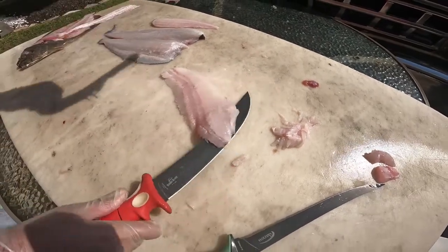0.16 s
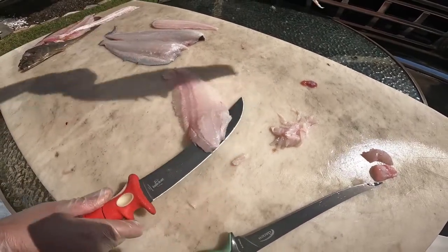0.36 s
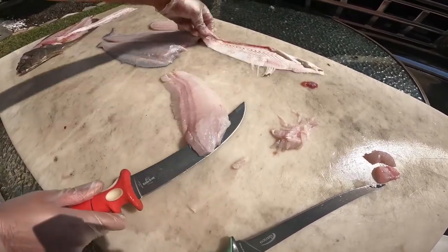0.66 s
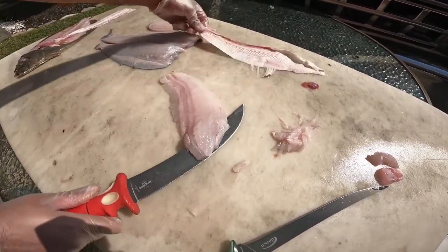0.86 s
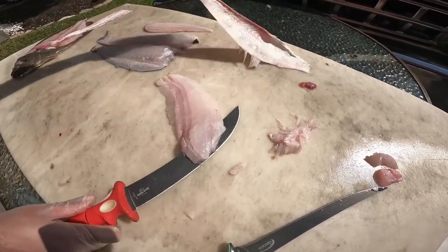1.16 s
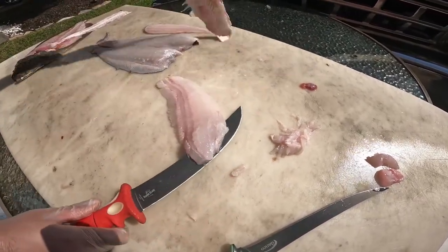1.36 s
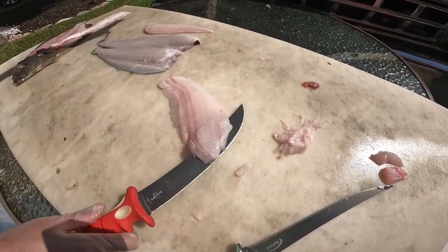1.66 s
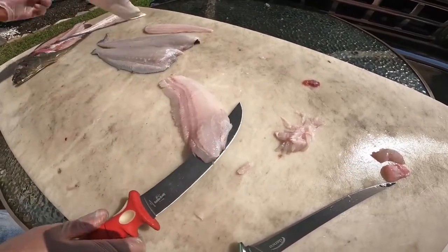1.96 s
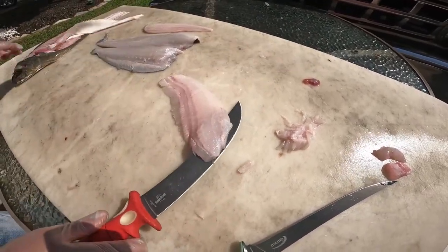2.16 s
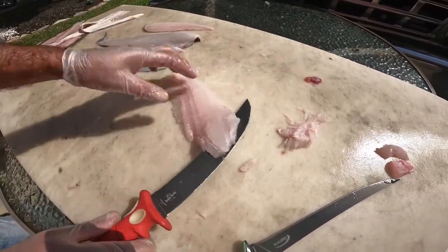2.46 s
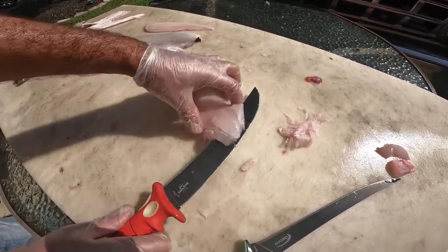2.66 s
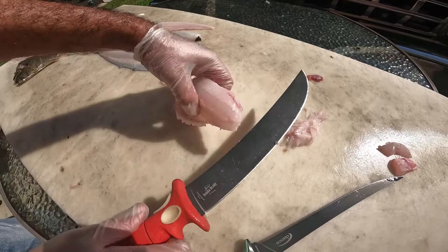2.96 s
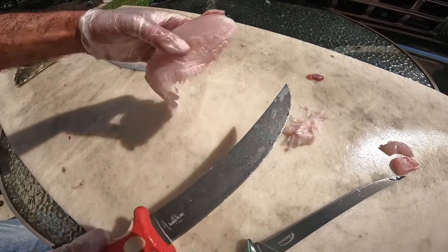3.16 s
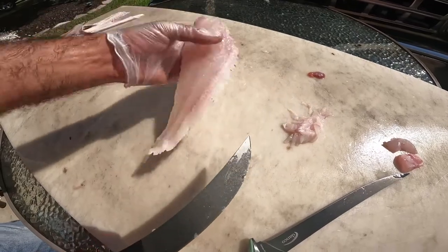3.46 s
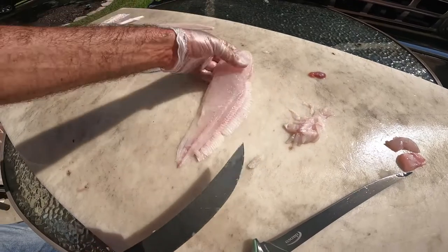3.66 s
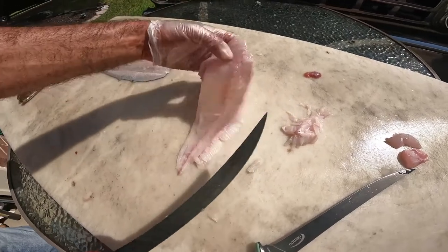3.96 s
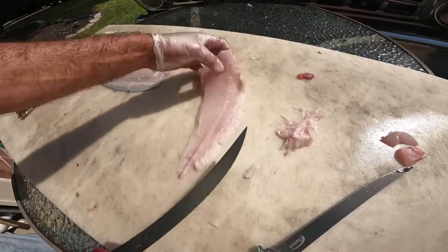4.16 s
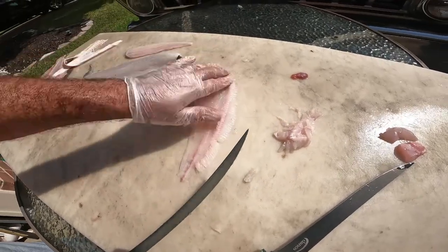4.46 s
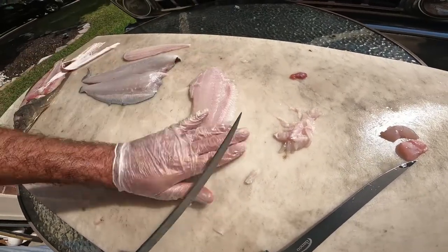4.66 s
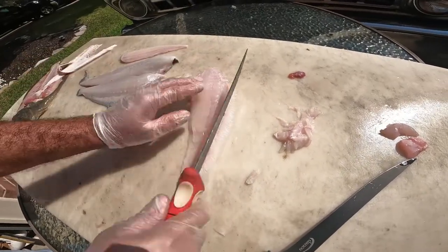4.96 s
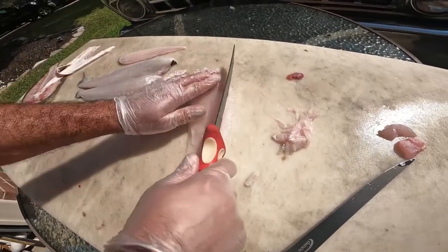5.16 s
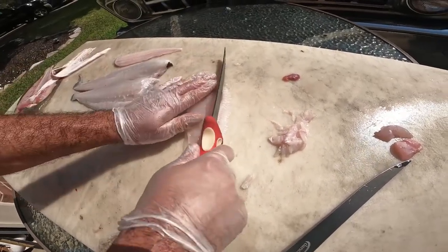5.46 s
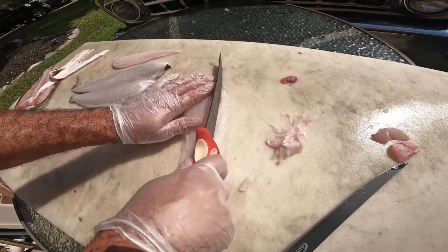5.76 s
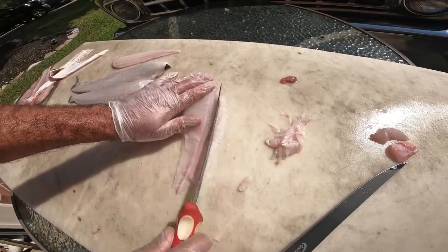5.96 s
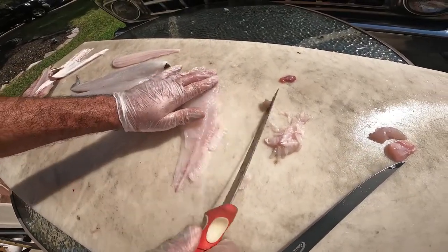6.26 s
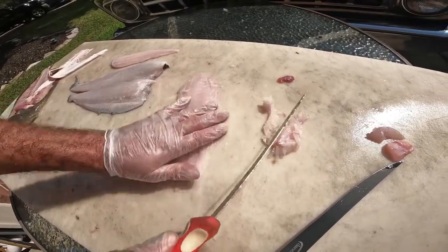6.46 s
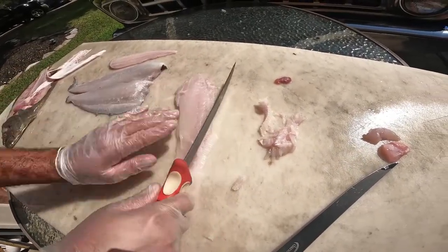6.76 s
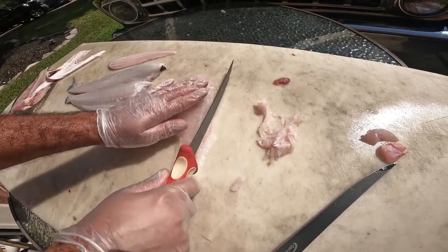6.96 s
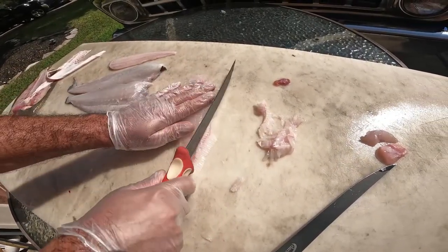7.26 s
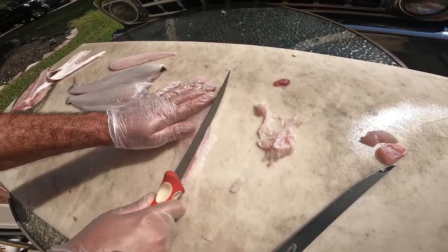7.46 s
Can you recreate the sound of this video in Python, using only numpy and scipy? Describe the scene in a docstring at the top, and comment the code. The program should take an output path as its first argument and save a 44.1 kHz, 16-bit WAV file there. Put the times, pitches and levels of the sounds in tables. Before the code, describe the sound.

Close stereo microphone at an outdoor table. A knife slides briefly through fish skin, then a sharp wet slap lands with a soft thud. Quiet sticky clicks and glove rustle follow, another flop and thud in the middle, a knife knock on the hollow board, a soft slice, a loud ringing scrape, more knocks and a final swelling slice. A faint motor hums far off over low rumble.

```python
"""A steel blade slides, slices, scrapes and knocks as fish fillets are skinned and trimmed outdoors on a
hard board on a hollow table: friction noise drives the strokes, struck modes ring in the knocks.
Wet flesh slaps, thuds and clicks as short decaying pulses; gloves rustle as hiss with resonant crackle.
Far off, a motor hums as harmonics of its shaft speed, over gliding narrow-band hiss and a low
outdoor rumble of coloured noise."""
import sys
import numpy as np
from scipy import signal
from scipy.fft import rfft, irfft, next_fast_len
from scipy.io import wavfile

SR = 44100
rng = np.random.default_rng(int(sys.argv[2]) if len(sys.argv) > 2 else 0)


def to_wav(s):
    """Save 16-bit WAV."""
    ch = np.atleast_2d(s).T  # columns
    pcm = np.round(np.clip(ch, -1, 1) * 32767)  # PCM
    wavfile.write(sys.argv[1], SR, pcm.astype(np.int16))


N = 336042
TIME = np.arange(N) / SR

# Modes of the steel blade, the lower ones damped by contact: f/Hz, relative level/dB, t60/s
BLADE_MODES = [(581, -6, .05), (964, -8, .06), (1222, -5, .06), (1820, -9, .04), (2300, -6, .02),
               (2758, -7, .04), (2841, -3, .045), (3500, -5, .015), (4770, -8, .025), (6308, -10, .17),
               (6777, -11, .06), (7455, -11, .07), (8250, -9, .03), (9910, -8, .025), (10970, -10, .08),
               (11150, -4, .03), (12800, -9, .03)]
# Modes of the board on its hollow table: f/Hz, relative level/dB, t60/s
BOARD_MODES = [(96, -8.5, 0.051), (150.44, -5, 0.18), (223.7, -10.5, 0.29), (287, -5, 0.11),
                (381.4, -3.5, 0.19), (491, -9, 0.12), (539, -1.5, 0.087), (543, 9, 0.024), (701, -3, 0.071),
               (740, -11, 0.026), (900, -20, 0.081), (943, -14.5, .06), (1112, -4, 0.04),
               (1220, -11, 0.044), (1500, -16.5, 0.057), (1640, -5.5, 0.043), (1950, -17, 0.022)]


def from_db(db):
    """Amplitude ratio of a level in dB."""
    return 10 ** (np.asarray(db) / 20)


def rms_one(x):
    """Normalisation to unit root mean square."""
    return x / np.sqrt(np.mean(x ** 2) + 1e-20)


def at_hz(points, hz):
    """Interpolation of a spectrum along a logarithmic frequency axis."""
    points = np.array(points)
    return np.interp(np.log(hz), np.log(points[:, 0]), points[:, 1])


def bin_hz(size):
    """Frequencies of the Fourier bins, held at 1 Hz or more so that their logarithm exists."""
    return np.maximum(np.arange(size // 2 + 1) * SR / size, 1)


def filtered(x, order, hz, kind="low"):
    """Causal Butterworth filtering: a passband free of ripple."""
    return signal.sosfilt(signal.butter(order, hz, kind, fs=SR, output="sos"), x)


def drift(rate_hz, size=N):
    """Slow random modulation of unit spread: noise through two equal one-pole low-passes."""
    step = 40  # samples between the coarse points
    pole = np.exp(-2 * np.pi * rate_hz * step / SR)
    settling = 2000  # coarse points dropped while the filter settles
    noise = rng.standard_normal(size // step + settling + 2)
    slow = rms_one(signal.lfilter([1], [1, -2 * pole, pole * pole], noise))[settling:]
    return np.interp(np.arange(size) / step, np.arange(len(slow)), slow)


def coloured(x, spectrum):
    """Spectral shaping by multiplication in the frequency domain, at unit rms."""
    size = next_fast_len(x.shape[-1])
    shaped = irfft(rfft(x, size) * from_db(at_hz(spectrum, bin_hz(size))), size)
    return rms_one(shaped[..., :x.shape[-1]])


def ring(x, hz, t60):
    """Damped resonance: a unit click excites a decaying sine of initial height near 1."""
    radius = from_db(-60 / (t60 * SR))
    angle = 2 * np.pi * min(hz, 16000) / SR
    feedback = [1, -2 * radius * np.cos(angle), radius * radius]
    return signal.lfilter([0, np.sin(angle)], feedback, x + 1e-18)


def modes(x, table):
    """Modal superposition: the resonances of a body add, neighbours in opposite phase."""
    return sum((-1) ** k * from_db(db) * ring(x, hz, t60) for k, (hz, db, t60) in enumerate(table))


def burst(t, rise_s, fall_s):
    """Exponential attack and decay of an envelope."""
    return (1 - np.exp(-t / rise_s)) * np.exp(-t / fall_s)


def grains(per_s, spread_db, size):
    """Random micro-contacts: sparse impulses of very uneven strength and random sign, at unit rms."""
    strength = from_db(spread_db * np.minimum(rng.exponential(1, size), 4))
    strength = strength * rng.choice([-1, 1], size)
    return rms_one(strength * (rng.random(size) < per_s / SR))


def patchy(x, patch_db):
    """Independent band modulation: each third-octave band swells and sinks by itself."""
    wander_hz = 23
    size = next_fast_len(len(x))
    # position in third octaves above 500 Hz; everything lower belongs to the first band
    place = 3 * np.log2(np.maximum(bin_hz(size), 500) / 500)
    whole = rfft(x, size)
    total = np.zeros(len(x))
    for k in range(16):
        band = irfft(whole * np.clip(1 - abs(place - k), 0, 1), size)[:len(x)]
        total += from_db(patch_db * drift(wander_hz, size=len(x))) * band
    return total


def panned(x, pan_db):
    """Stereo placement by level difference: left louder by pan_db."""
    return np.array([x * from_db(pan_db / 2), x * from_db(-pan_db / 2)])


def add(out, s, piece):
    """Superposition of a stereo piece at time s."""
    i = round(s * SR)
    out[:, i:i + piece.shape[1]] += piece[:, :N - i]


def stroke(rows, colour, grit, judder_db, ring_db, pan_db, patch_db, echo_ms):
    """Friction excitation: noise and grit under varying pressure drive the blade, which rings on a little."""
    s, level_db = np.transpose(rows)
    tail = 9000  # samples for the blade to ring out
    t = s[0] + np.arange(round((s[-1] - s[0]) * SR) + tail) / SR
    contact = rng.standard_normal(len(t)) + grit * grains(2100, 2.6, len(t))
    contact = patchy(contact, patch_db)
    pressure = from_db(np.interp(t, s, level_db, right=-120) + judder_db * drift(60, size=len(t)))
    ringing = modes(contact * pressure, BLADE_MODES) / np.std(modes(contact, BLADE_MODES))
    # the path along blade and board changes as the contact travels, so the comb stripes glide
    lag_s = np.interp(t, [s[0], s[-1]], echo_ms) / 1000
    rub = coloured(contact, colour)
    first_echo = 0.091 * np.interp(t - lag_s, t, rub)
    second_echo = -0.14 * np.interp(t - 2.7 * lag_s, t, rub)
    rub = rms_one(rub + first_echo + second_echo)
    out = np.zeros((2, N))
    add(out, s[0], panned(pressure * rub + from_db(ring_db) * ringing, pan_db))
    return out


def skinning():
    """Sliding friction of the blade between skin and flesh."""
    # Stroke pressure: t/s, level/dB
    pressure_rows = [(0.0, -49.5), (0.096, -41), (0.13, -46.5), (0.172, -45.5), (0.19, -54.5),
                     (0.238, -57.5), (0.25, -60.5), (0.32, -73)]
    # Friction spectrum: f/Hz, relative density/dB
    colour = [(260, -44), (450, -30), (595, 5.5), (679, -38), (897, -11), (965, -22), (1900, -6.5),
              (3460, -13.5), (3900, -7.5), (4500, -9), (5220, -24), (9520, -18.5), (13000, -29.5),
              (15000, -46)]
    return stroke(pressure_rows, colour, grit=1.0, judder_db=1.0, ring_db=-23, pan_db=-2.5,
                  patch_db=2.0, echo_ms=(.5, .55))


def skin_drag():
    """Sliding friction of the skin drawn along the board, with little grit."""
    # Stroke pressure: t/s, level/dB
    pressure_rows = [(0.645, -41.5), (0.655, -50), (0.679, -48), (0.765, -57), (0.85, -74.5)]
    # Friction spectrum: f/Hz, relative density/dB
    colour = [(590, -42.5), (1000, -8.5), (1820, -8.5), (2160, 0.5), (3520, -7), (4890, -8), (6710, -17),
              (12100, -20.5), (13500, -25), (15000, -58)]
    return stroke(pressure_rows, colour, grit=0.22, judder_db=1.1, ring_db=-60, pan_db=-1.0,
                  patch_db=1.2, echo_ms=(.42, .4))


def slicing():
    """Cutting friction that swells and dies, the blade hardly ringing."""
    # Stroke pressure: t/s, level/dB
    pressure_rows = [(5.76, -72), (5.842, -52), (5.926, -42.5), (6.002, -47), (6.06, -67)]
    # Friction spectrum: f/Hz, relative density/dB
    colour = [(410, -17), (700, -15), (859, -24.5), (965, -0.5), (1150, -2.5), (1720, -9), (2490, -11.5),
              (4160, -15.5), (5310, -26.5), (7510, -19), (11300, -25), (13500, -29), (15000, -62)]
    return stroke(pressure_rows, colour, grit=0.62, judder_db=-1.0, ring_db=-50.0, pan_db=-1.5,
                  patch_db=1.0, echo_ms=(.75, .85))


def scraping():
    """Hard friction along the board, strongly coupled to the modes of the blade."""
    # Stroke pressure: t/s, level/dB
    pressure_rows = [(6.13, -64), (6.142, -37.5), (6.225, -25), (6.245, -31.5), (6.266, -27.5), (6.29, -48),
                     (6.303, -46), (6.34, -67)]
    # Friction spectrum: f/Hz, relative density/dB
    colour = [(210, -45), (350, -16), (385, -29), (597, -2), (733, -8.5), (1190, -4.5), (2130, -12),
              (2830, -3), (4070, -15), (8790, -13), (11300, -7.5), (13200, -16.5), (15000, -45)]
    return stroke(pressure_rows, colour, grit=0.3, judder_db=1.6, ring_db=-5.5, pan_db=-2.6,
                  patch_db=2.5, echo_ms=(.7, .75))


def last_slice():
    """Cutting friction that grows toward the end, uneven from band to band."""
    # Stroke pressure: t/s, level/dB
    pressure_rows = [(7.3, -69.5), (7.442, -55), (7.562, -40), (7.62, -44)]
    # Friction spectrum: f/Hz, relative density/dB
    colour = [(290, -6.5), (500, -1.5), (788, -14.5), (1140, 3.5), (1350, -7), (1500, -1.5), (2880, -11.5),
              (4230, -5.5), (5380, -22), (6670, -9.5), (8610, -13.5), (9650, -9.5), (15000, -24)]
    return stroke(pressure_rows, colour, grit=0.71, judder_db=0.5, ring_db=-31, pan_db=-1.7,
                  patch_db=3.0, echo_ms=(.8, .7))


def grip():
    """Low, juddering friction as fingers grip the fillet and rock the board."""
    # Grip pressure: t/s, level/dB
    pressure_rows = [(2.56, -62), (2.626, -48.5), (2.652, -67), (2.68, -65), (2.7, -59), (2.75, -37),
                     (2.76, -42), (2.82, -59)]
    # Friction spectrum: f/Hz, relative density/dB
    colour = [(59, -28), (100, -17), (179, 8), (259, -8.5), (463, -5), (877, -31.5), (2210, -26),
              (2410, -26.5), (3500, -41), (4550, -77), (7700, -120)]
    return stroke(pressure_rows, colour, grit=1.15, judder_db=5.0, ring_db=-60, pan_db=-3.0,
                  patch_db=0.5, echo_ms=(1.2, 1.3))


def knocks():
    """Impact excitation: a blunt push rings board and table; the edge ticks and rings the upper blade modes."""
    # Edge landing on the board: t/s, relative body level/dB, edge tick level/dB, blade ring level/dB,
    # rattle level/dB, contact time constant/ms
    landings = [(5.433, -9.5, -40, -83, -24, 0.053), (6.941, -12.5, -42, -53.5, -43, 0.32),
                (7.05, -7.5, -36.5, -73.5, -26, 0.2), (7.189, -53, -58, -60.5, -70, 0.22)]
    out, t = np.zeros((2, N)), np.arange(16000) / SR
    upper = [mode for mode in BLADE_MODES if mode[0] > 5000]
    for s, body_db, tick_db, ring_db, rattle_db, contact_ms in landings:
        push = t * np.exp(-1000 * t / contact_ms)
        body = modes(push / push.sum(), BOARD_MODES)
        tick_envelope = burst(t, 0.00088, 0.0025) + 0.059 * burst(t, 0.0017, .012)
        tick = rng.standard_normal(len(t)) * tick_envelope
        blade = modes(1. * (t == 0), upper)
        rattle = rms_one(filtered(rng.standard_normal(len(t)), 2, [600, 1500], "band"))
        rattle = rattle * (burst(t, 0.00038, 0.0033) + 0.08 * burst(t, 0.0013, 0.041))
        hit = from_db(body_db - 12.5) * body + from_db(tick_db) * tick
        hit = hit + from_db(ring_db) * blade + from_db(rattle_db) * rattle
        add(out, s, panned(hit, -2.6))
    return out


def slaps():
    """Cavity collapse: trapped air snaps, the wet film sprays a short tail, the weight rings the board."""
    # Wet slaps: t/s, snap level/dB, snap f/Hz, spray level relative to snap/dB, left over right/dB,
    # board level/dB
    impacts = [(0.23, -35, 1050, -12, 1, -63), (.614, -42.5, 2500, -5, -7, -67),
               (0.6238, -30.5, 2390, -8.5, -5, -57), (0.6318, -25.5, 1500, 15.5, -2, -54),
               (.6326, -10, 2500, -14, -3, -46), (.6360, -2.5, 2550, -19, -4, -46),
               (2.037, -43, 1500, -17, 4, -74), (2.0894, -28, 1560, 1, 0, -47),
               (2.096, -33.5, 2300, -1, -6, -46.5), (2.389, -49, 1290, 1, -2, -69),
               (2.476, -36, 1700, 1.5, -3, -56), (2.732, -40, 1197, -14, -2, -55),
               (2.739, -43, 2400, -27, -2, -67), (2.748, -46, 2400, -14, -2, -52),
               (3.532, -30.5, 3760, -1, 1, -49), (3.540, -25.5, 3860, 5.5, -3.5, -37),
               (3.5431, -15, 2160, -3, -1, -49), (3.554, -27, 1990, -7, -3, -45),
               (4.1472, -32.5, 1630, -6, -2, -43), (4.195, -44, 2400, 0, -6, -48),
               (4.199, -34, 2370, -10, -4, -46.5), (4.205, -33.5, 2770, -11, -4, -56),
               (4.211, -40, 2800, -5, 0, -68), (5.424, -54, 900, -10, -4, -50)]
    out, t = np.zeros((2, N)), np.arange(8000) / SR
    click = 1. * (t == 0)
    push = t * np.exp(-t / 0.000074)
    board = modes(push / push.sum(), BOARD_MODES)
    for s, snap_db, pitch_hz, tail_db, pan_db, weight_db in impacts:
        snap = ring(click, pitch_hz, 9 / pitch_hz)
        snap = snap - .5 * ring(click, 1.75 * pitch_hz, .002) + .5 * ring(click, 3.2 * pitch_hz, .001)
        band_hz = [.6 * pitch_hz, min(3.5 * pitch_hz, 15000)]
        spray = filtered(rng.standard_normal(len(t)), 2, band_hz, "band") * burst(t, .0007, .004)
        slap = from_db(snap_db) * (snap + from_db(tail_db) * spray)
        add(out, s, panned(slap + from_db(weight_db) * board, pan_db))
    return out


def thuds():
    """Soft impact: flesh or hands push slowly, and the table answers with a few damped cycles."""
    # Soft landings: t/s, level/dB, f/Hz
    landings = [(0.633, -24.5, 145), (2.593, -30, 163.6), (2.621, -30, 167), (2.734, -30.5, 161.6),
                (2.99, -31.5, 197.4), (3.541, -24, 145.3), (3.559, -25.5, 142.7), (4.195, -44, 163)]
    out, t = np.zeros((2, N)), np.arange(8000) / SR
    for s, level_db, pitch_hz in landings:
        swing = burst(t, .002, 0.018) * np.sin(2 * np.pi * pitch_hz * t)
        add(out, s, panned(from_db(level_db) * swing, -1.5))
    return out


def clicks():
    """Bubble resonance: parting wet film pops at its own pitch, on a faint broadband puff."""
    # Parting of the film: t/s, relative level/dB, f/Hz, left over right/dB
    pops = [(0.0757, -29, 4120, 2), (0.1604, -44, 4300, 4), (0.303, -46, 10000, 0), (0.339, -50, 9500, 0),
            (0.531, -50, 9000, 0), (0.5434, -43.5, 9000, -2), (0.591, -47, 2780, 0), (1.1492, -41, 3140, 7),
            (1.678, -57.5, 10190, -2.5), (1.787, -46.5, 3804, -4), (1.994, -47.5, 7160, -1),
            (2.0367, -53, 6760, -5), (2.0903, -12, 7140, 3.5), (2.0956, -22, 7840, 2),
            (2.2397, -38, 6850, -1), (2.5905, -53, 3730, -5), (2.7668, -45, 2590, -1.0),
            (2.786, -52, 2550, 2), (2.8095, -48, 4550, -0.5), (2.859, -32, 7600, -2),
            (2.9153, -42, 7350, -10), (2.936, -35, 11130, 0.5), (2.9572, -41, 6930, 5),
            (2.9774, -40, 9150, 0.5), (3.024, -40.5, 7150, 2), (3.102, -39, 4600, -4),
            (3.51, -41, 4240, -5), (3.527, -30, 5100, 15), (3.568, -33, 4250, 5), (3.596, -42, 4240, 11),
            (3.792, -41.5, 7240, 3.5), (4.147, -33, 10500, 3), (4.2997, -37.5, 3400, 1.5),
            (4.4575, -42.5, 10900, 1.5), (4.595, -44, 7300, -1), (4.621, -41.5, 4200, -1.0),
            (5.4061, -46, 3180, 1), (5.657, -48.5, 10920, 1.0), (6.0705, -36, 10000, -4),
            (6.3414, -51, 8500, 3), (6.354, -45, 11500, 7), (6.5052, -37.5, 6960, 0.5),
            (7.2826, -40, 9800, 4)]
    out, t = np.zeros((2, N)), np.arange(1000) / SR
    for s, level_db, pitch_hz, pan_db in pops:
        # differencing tilts the noise toward the treble
        puff = np.diff(rng.standard_normal(len(t) + 1)) * burst(t, .0008, 0.0022)
        impulse = rng.standard_normal(len(t)) * burst(t, 0.00071, 0.0005)
        pop = ring(impulse, pitch_hz, 9.0 / pitch_hz)
        click = pop / np.abs(pop).max() + 0.25 * puff
        add(out, s, panned(from_db(level_db - 5.5) * click, pan_db))
    return out


def rubbing():
    """Power addition of overlapping rubs, giving the strength of a lower and an upper band."""
    # Rubs of gloves and flesh: full strength from t/s, lower-band level/dB, upper over lower/dB,
    # rise per 20 dB/s, hold/s, fall per 20 dB/s
    rubs = [(0.31, -69.5, -8, .05, 0.017, 0.068), (0.466, -72.5, -9, .08, .01, 0.044),
            (0.616, -62, -10, .05, .02, .05), (1.05, -72, 6, 0.19, 0.28, .6),
            (1.789, -67.5, -4, 0.028, 0.011, 0.073), (1.928, -72.5, -4, 0.054, 0.024, 0.032),
            (2.05, -70, 4, .07, 0.066, .03), (2.084, -58.5, 3, .02, .01, 0.088),
            (2.39, -66, -10, 0.16, .02, 0.16), (2.475, -53, -2, 0.0095, 0.0082, 0.023),
            (2.601, -62, -7, 0.04, 0.021, .12), (2.704, -66, 2.5, 0.035, .03, 0.022),
            (2.785, -65, 2, 0.026, 0.11, 0.19), (3.086, -69.5, 1.5, 0.22, .01, 0.079),
            (3.187, -74.5, -4, .08, 0.13, .06), (3.552, -53, -4.5, .05, 0.018, 0.11),
            (3.657, -76, 0.5, .05, 0.086, 0.45), (3.792, -67.5, 3, 0.034, .03, 0.16),
            (4.148, -59.5, -2, 0.015, 0.0079, 0.068), (4.193, -58, -9, .005, .017, 0.095),
            (4.298, -68, -10, .03, 0.0075, .05), (4.55, -70.5, -1.5, 0.52, .04, 0.12),
            (4.63, -61, 4, 0.026, 0.016, 0.071), (4.68, -72.5, 5.5, .05, 0.022, 0.34),
            (4.735, -69.5, 8.5, .03, 0.0097, 0.022), (5.439, -78, -6, .04, 0.0088, .07),
            (5.75, -71.5, -3.5, .25, .05, .1), (6.08, -76.5, 2.5, 0.045, .05, .05),
            (6.343, -71, -10, .04, 0.027, 0.17), (6.489, -74, 9.5, 0.3, 0.029, 0.086),
            (6.666, -72, 0, 0.023, 0.0093, 0.037), (7.05, -76, 0, .02, 0.011, .1),
            (7.185, -81, 7.5, .015, 0.028, 0.19)]
    power = np.zeros((2, N))
    for s, level_db, bright_db, rise_s, hold_s, fall_s in rubs:
        before = (s - TIME) / max(rise_s, .002)
        after = (TIME - s - hold_s) / max(fall_s, .002)
        away = np.clip(np.maximum(before, after), 0, 4)
        band_db = level_db + np.array([[0], [bright_db]])
        power += from_db(2 * band_db) * from_db(-40 * away)  # squared amplitudes
    return np.sqrt(power)


def handling():
    """Rustle of thin plastic and wet flesh: friction hiss plus clumped crackle from resonant creases."""
    # Rustle spectrum: f/Hz, relative density/dB
    rustle_colour = [(530, -41.5), (900, -11), (1600, -2), (1850, -17), (2600, -7.5), (4050, -7.5),
                     (5480, -19.5), (6250, -16.5), (7770, -17), (12900, -21), (16000, -38)]
    crackle_share = 0.37
    pops = grains(900, 4.0, N) * from_db(4.0 * drift(25))
    # each pop falls to one of ten creases, which rings a few cycles at its own pitch
    crease = rng.integers(0, 10, N)
    pitches = np.geomspace(1800, 12500, 10)
    crackle = sum(ring(pops * (crease == k), hz, 7.2 / hz) * np.sqrt(hz) for k, hz in enumerate(pitches))
    mix = (1 - crackle_share) * rng.standard_normal(N) + crackle_share * rms_one(crackle)
    rub = coloured(patchy(mix, patch_db=3.0), rustle_colour)
    # zero-phase split, so that the remainder is the upper band
    low = signal.sosfiltfilt(signal.butter(3, 5500, fs=SR, output="sos"), rub)
    lower, upper = rubbing()
    return lower * rms_one(low) + upper * rms_one(rub - low)


def spread(near, wet_db):
    """Early scattering off table and body, partly decorrelated between the sides; the bass passes unscattered."""
    length = 1300  # samples, over which the echoes fade by 40 dB
    fade = from_db(-np.linspace(0, 40, length))
    shared, own = rng.standard_normal((2, length)) * fade / np.linalg.norm(fade)
    echoes = filtered(shared + 1.5 * own * [[1], [-1]], 2, 900, "high")
    return near + from_db(wet_db) * signal.fftconvolve(near, echoes, axes=1)[:, :N]


def motor():
    """Harmonic series of the shaft speed, each order wavering in level and phase on its way through the air."""
    # Orders of the shaft: multiple of the shaft speed, level/dB rms
    orders = [(1, -60.5), (2, -58), (3, -60.5), (4, -53), (6, -69), (8, -68)]
    turns_per_s, wander = 48.2, 0.012  # mean shaft speed, relative spread of its drift
    turns = np.cumsum(turns_per_s * (1 + wander * drift(.5))) / SR
    hum = np.zeros(N)
    for multiple, level_db in orders:
        height = np.sqrt(2) * from_db(level_db + 2.7 * drift(4.0))
        hum += height * np.sin(2 * np.pi * multiple * turns + 0.71 * drift(1.9))
    return hum


def far_hiss():
    """Quadrature modulation: slow noise on a gliding carrier gives the narrow far hiss of tyres or air."""
    # Course of the hiss: t/s, level/dB, centre f/Hz
    course = [(0.0, -73, 1580), (0.2, -56.5, 1540), (0.551, -67, 1480), (0.801, -76, 1420),
              (1.17, -64, 1372), (1.6, -81, 1330), (2.0, -64.5, 1520), (2.6, -73.5, 1480),
              (2.93, -61, 1560), (3.221, -61, 1470), (3.65, -82, 1560), (4.2, -64, 1380), (4.75, -79, 1350),
              (4.95, -66, 1400), (5.4, -72.5, 1260), (5.949, -64.5, 1290), (6.4, -78, 1290),
              (7.09, -72, 1500), (7.34, -62.5, 1308), (7.62, -59, 1290)]
    s, level_db, centre_hz = np.transpose(course)
    phase = 2 * np.pi * np.cumsum(np.interp(TIME, s, centre_hz)) / SR
    slow = filtered(rng.standard_normal((2, 2, N)), 2, 170)
    mid, side = slow[0] * np.cos(phase) + slow[1] * np.sin(phase)
    return from_db(np.interp(TIME, s, level_db)) * rms_one(mid + 0.75 * side * [[1], [-1]])


def outdoors():
    """Partial coherence: rumble of far traffic and air whose two sides part toward the treble."""
    # Rumble spectrum: f/Hz, relative density/dB
    rumble_colour = [(15, -31.5), (25, -1), (63, 3.5), (134, -6.5), (195, -0.5), (249, -11.5), (373, -12.5),
                     (439, -15.5), (818, -30.5), (1370, -26.5), (1890, -33), (5280, -55), (6920, -49.5),
                     (10700, -50.5), (16000, -73)]
    # Course of the rumble: t/s, level/dB
    course = [(0.0, -46), (1.4, -48), (2.46, -45), (2.74, -42.5), (2.95, -47), (3.3, -48), (3.61, -40),
              (3.8, -51.5), (4.05, -45), (5.22, -49), (6.2, -44), (6.45, -50), (7.34, -48.5), (7.62, -49.5)]
    # Likeness of left and right: f/Hz, correlation (0 to 1)
    likeness = [(60, 1), (180, 0.92), (550, 0.69), (1650, 0.59), (4970, 0.54), (15000, 0.42)]
    white = rng.standard_normal((2, N))
    alike = np.clip(at_hz(likeness, bin_hz(N)), 0, .999)
    mid, side = irfft(rfft(white) * np.sqrt([1 + alike, 1 - alike]), N)
    bed = coloured(mid + side * [[1], [-1]], rumble_colour)
    swell_db = 1.2 * drift(5)
    return from_db(np.interp(TIME, *np.transpose(course)) + swell_db) * bed


def scene():
    """Superposition of scattered near work on the board and the far background."""
    near = skinning() + skin_drag() + slicing() + scraping() + last_slice() + grip()
    near += knocks() + slaps() + thuds() + clicks() + panned(handling(), -0.89)
    right_lean_db = 0.76
    far = panned(1, -right_lean_db)[:, None] * (motor() + far_hiss() + outdoors())
    return spread(near, wet_db=-13) + far


def record(dry):
    """Linear filtering by the microphone housing: a lower-treble notch and a dull top, then a steep cut."""
    # Microphone in its housing: f/Hz, left level/dB, right level/dB
    response = np.array([(20, -11.5, -5), (40, -1, 0), (4570, -1.5, -1.5), (5600, -3.5, -4.5),
                         (6367, 0.5, -1), (9100, -1.5, -2.5), (12930, 0, -5), (14200, -12.5, -10.5),
                         (16000, -21, -19)])
    cutoff_hz = 16527
    size = next_fast_len(N)
    gain = from_db([at_hz(response[:, [0, side]], bin_hz(size)) for side in (1, 2)])
    heard = irfft(rfft(dry, size) * gain, size)[:, :N]
    return signal.sosfilt(signal.cheby2(12, 70, cutoff_hz, fs=SR, output="sos"), heard)


dry = scene()
out = record(dry)
to_wav(out)
```